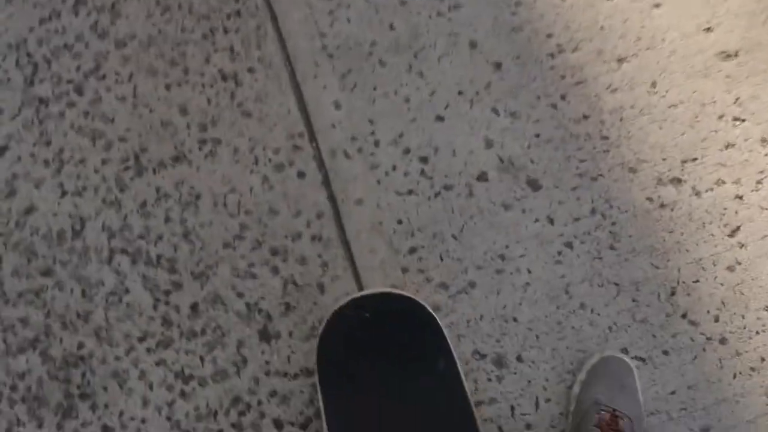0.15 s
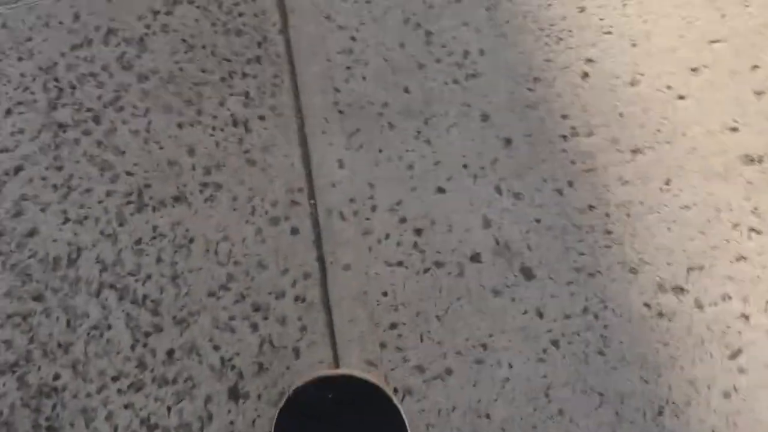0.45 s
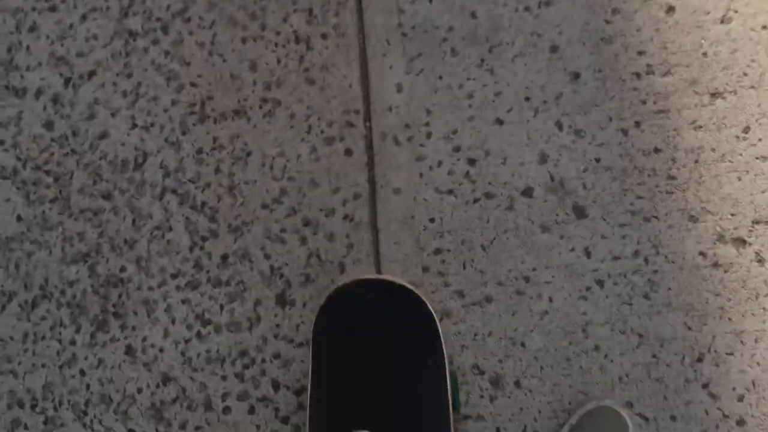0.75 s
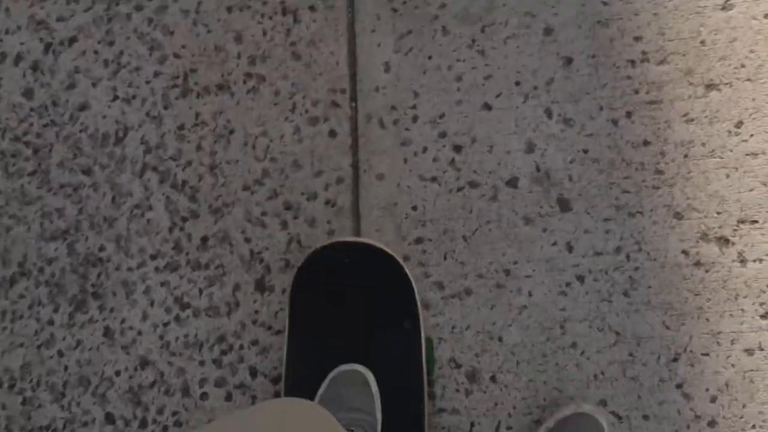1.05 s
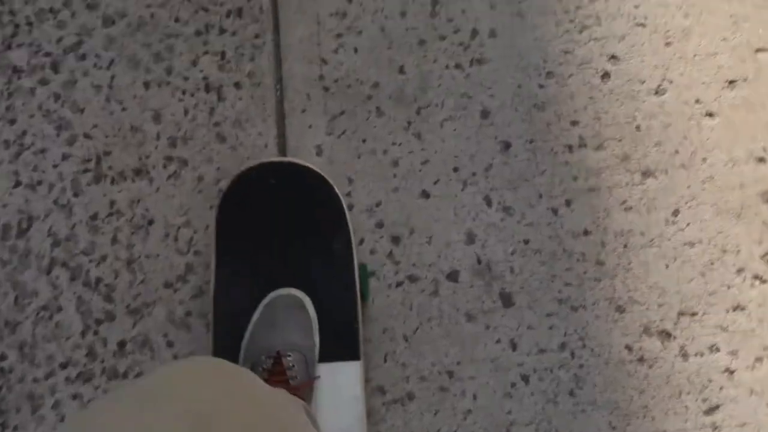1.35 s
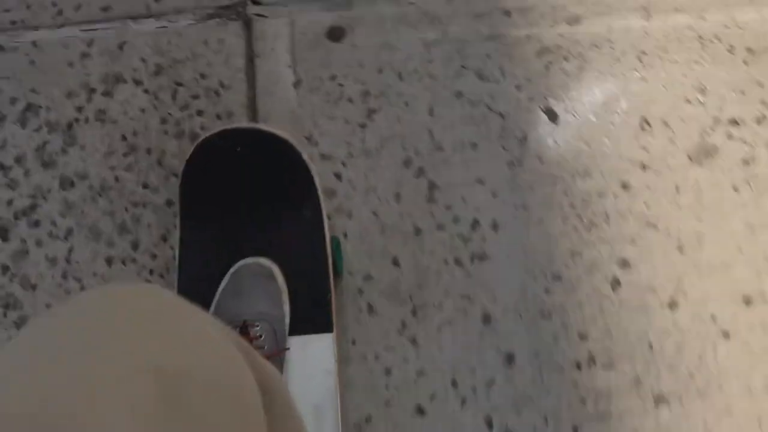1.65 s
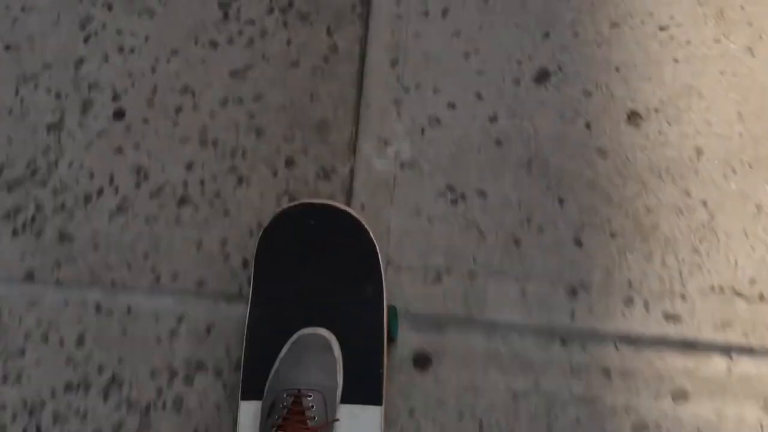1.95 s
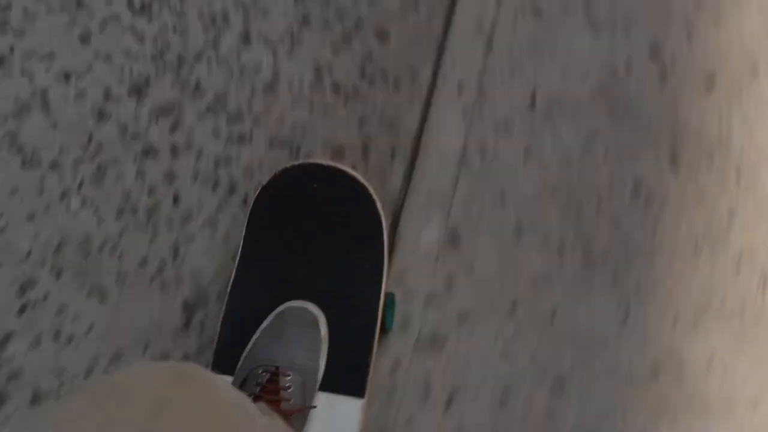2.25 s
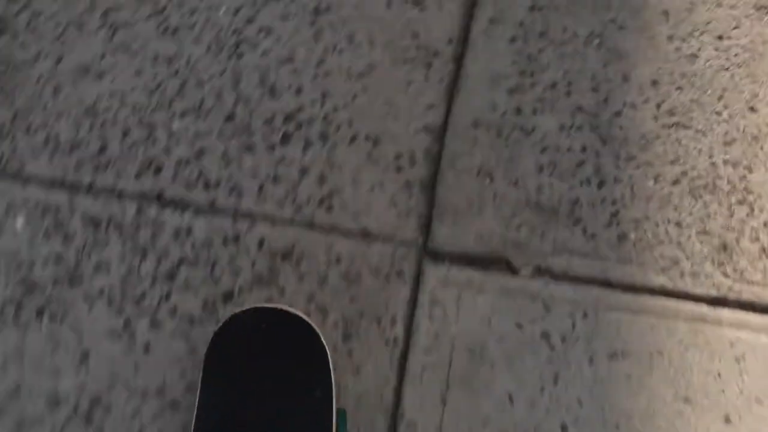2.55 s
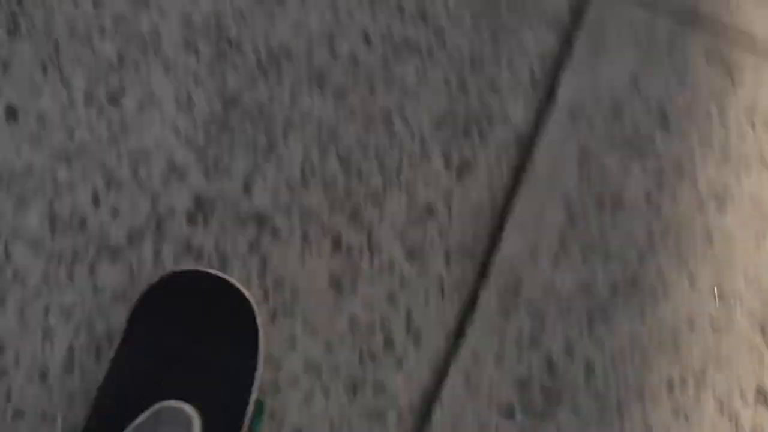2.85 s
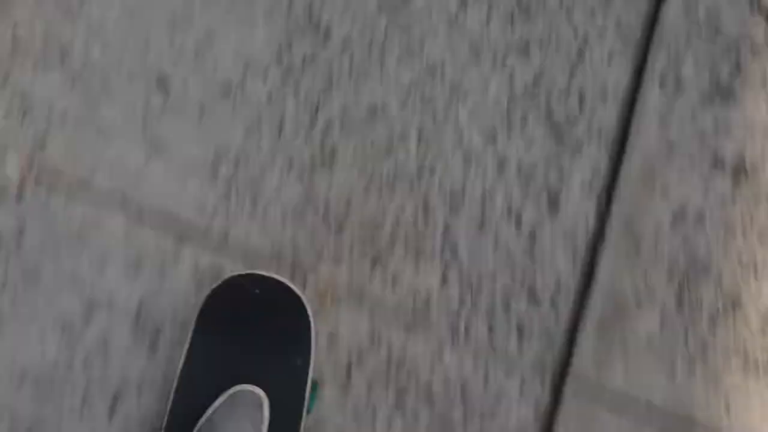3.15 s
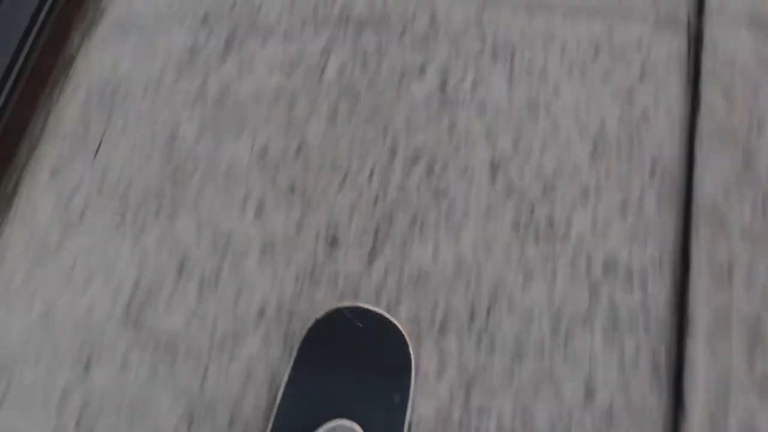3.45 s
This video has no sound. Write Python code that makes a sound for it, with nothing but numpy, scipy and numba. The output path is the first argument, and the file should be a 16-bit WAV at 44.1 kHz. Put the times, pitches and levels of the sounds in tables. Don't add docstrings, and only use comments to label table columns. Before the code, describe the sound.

A skateboard rolls along rough pavement, clattering over stones and slab joints, wind buffeting the microphone

```python
import sys
import numpy as np
from scipy import signal
from scipy.fft import rfft, irfft
from scipy.io import wavfile
from scipy.ndimage import uniform_filter1d, map_coordinates
from numba import njit

SR = 44100
rng = np.random.default_rng(int(sys.argv[2]) if len(sys.argv) > 2 else 0)


def nominal_scale(level):
    x = np.asarray(level, float) / 20
    return 10 ** x


def materialize(psi):
    bounded = np.clip(np.atleast_2d(psi).T, -1, 1)
    quanta = np.round(bounded * 32767).astype(np.int16)
    wavfile.write(sys.argv[1], SR, quanta)


N = 158760

# time in seconds, level in dB.
GUSTS = [(0.0, -30), (0.06, -34.5), (1.38, -42.5), (1.56, -34), (1.92, -42), (1.951, -30.5), (2.45, -62),
         (2.55, -30.5), (2.72, -54), (3.22, -34), (3.33, -51), (3.6, -33)]
# frequency in Hz, level in dB.
WIND_SPECTRUM = [(8.8, -49), (15, -16), (43, -5.5), (100, -2.5), (130, -23.5), (220, -120)]
# start in seconds, end in seconds, level in dB.
HORN_TOOTS = [
    (.004, 0.035, -25),
    (3.571, 3.624, -33.5),
]
# frequency in Hz, level in dB.
HORN_PARTIALS = [(1026, 0), (1238, 0), (1626, -10), (2055, -1), (2557, -10)]
# time in seconds, level in dB, ring in Hz, brightness in dB.
KNOCKS = [(0.1, -4, 1490, -15), (0.202, -19.5, 574, -3.5), (0.246, -8, 1500, -5), (0.491, -35.5, 1620, -14),
          (0.587, -23, 695, -2), (0.641, -6.5, 1270, -11.5), (0.652, -12, 694, 8.5), (0.668, -4, 1180, -10),
          (0.711, 0, 1300, -11), (0.727, -4.5, 1740, -3), (0.805, -8.5, 670, -12), (0.869, -3, 660, -3.5),
          (1.111, -17.5, 630, -11.5), (1.22, -9.5, 1380, -9), (1.263, -0.5, 638, -5.5),
          (1.378, -2.5, 674, -21), (1.434, -1, 690, -9), (1.533, 1.5, 592, -19), (1.575, -13.5, 696, 0.5),
          (1.595, 0.5, 676, -20), (1.67, -4.5, 612, -10), (1.711, -11.5, 600, -2), (1.8, -33, 1040, 19.5),
          (1.876, 1, 1805, -5.5), (1.977, -25, 421, 6)]
# time in seconds, level in dB, ring in Hz, brightness in dB.
LATE_KNOCKS = [(2.046, 3, 608, -10), (2.056, -1.5, 435, -17), (2.133, -8.5, 870, -13),
               (2.179, -11.5, 1340, -14), (2.225, -10, 610, -32), (2.257, 5, 645, -20),
               (2.499, -18.5, 880, -6.5), (2.514, -32.5, 640, 2), (2.581, -24.5, 1800, -11),
               (2.646, -4.5, 650, -19.5), (2.694, -16.5, 470, -5), (2.751, -6, 613, -25),
               (2.774, -4, 470, -24), (2.891, -2.5, 665, -25), (3.007, -19, 529, -36),
               (3.051, -10, 460, -10), (3.106, -9, 760, -21), (3.136, -3, 493, -21.5),
               (3.162, 0.5, 573, -14), (3.214, -0.5, 604, -46), (3.239, 0.5, 784, -24.5),
               (3.269, -1, 530, -24), (3.289, -5, 700, -27), (3.301, 1.5, 427, -17.5),
               (3.354, -39, 529, -32), (3.4, -3.5, 520, -23), (3.452, -2, 674, -43), (3.477, -5, 660, -22)]
# time in seconds, level in dB, ring in Hz, brightness in dB.
THUMPS = [(0.153, -11, 150, -29), (.645, -8, 172.4, -40), (1.201, -9.5, 157, -36), (1.569, -19, 71.6, -47),
          (3.038, -8.5, 109.6, -47), (3.157, -10.5, 98, -43), (2.259, -8, 370, -39),
          (2.429, -31.5, 1710, -5), (0.867, -16.5, 3950, -10), (1.089, -8.5, 510, -26),
          (1.261, -10, 2010, 2.5), (1.432, -19, 3740, -1), (2.048, 0, 293, -36), (2.37, -32, 1590, -20),
          (2.397, -32.5, 1690, -16), (2.453, -31, 1630, -8), (2.537, -16.5, 116, -42),
          (2.572, -25.5, 1800, -11), (2.769, -19.5, 2300, 3), (2.909, -2.5, 480, -17.5),
          (3.165, -16.5, 2230, -8), (3.266, -13.5, 2100, 0.5), (1.876, -23.5, 4260, 9.5)]
# time in seconds, level in dB, ring in Hz.
PEBBLES = [(0.0902, -14.5, 1580), (0.1345, -48, 1430), (0.177, -14.5, 1440), (0.2178, -12.5, 1510),
           (0.261, -25.5, 1480), (0.2855, -17, 1780), (0.2981, -9, 1600), (0.3449, -15.5, 1380),
           (0.3605, -23, 1360), (0.3974, -19, 1780), (0.436, -7.5, 1920), (0.4938, -2.5, 1830),
           (0.5385, -15, 1700), (0.6146, -10, 1284), (0.775, -17, 1220), (0.8202, -16, 1290),
           (0.9455, -21, 1330), (1.004, -25, 1210), (1.062, -19, 1304), (1.1437, -19.5, 1230),
           (1.1785, -22.5, 1570), (1.2011, -38.5, 1220), (1.3436, -30.5, 1410), (1.5777, -16, 1780),
           (1.8874, -43.5, 1750), (1.9547, -15, 1720), (1.9758, -17, 1710), (2.0104, -19.5, 1360),
           (2.0298, -11, 1830), (2.8283, -19, 1220), (2.872, -18, 1270), (3.2088, -15, 1790),
           (3.2903, -17, 1980), (3.3103, -22, 2230)]
# time in seconds, level in dB, ring in Hz.
DECK_BUMPS = [(0.015, -10, 191), (0.138, -24, 620), (0.288, -20, 634), (1.393, -6.5, 233),
              (1.493, -26, 630), (1.544, -5.5, 617), (1.629, -5, 598), (1.644, -10.5, 590),
              (1.69, -7.5, 210), (1.97, -10.5, 229), (2.004, -9.5, 300), (2.78, -16, 275),
              (2.832, -15.5, 290), (2.871, -9, 270), (2.924, -5.5, 705), (3.112, -24, 290),
              (3.177, -3, 639), (3.192, -3, 305), (3.22, -9.5, 624), (3.278, -4.5, 614), (3.313, -16, 550),
              (3.419, -13, 480)]
# time in seconds, deck level in dB, truck level over deck in dB,
# truck ring in Hz, grit level over deck in dB.
ROLL = [(0, -24.5, -4.5, 1440, -22), (.3, -22.5, -5, 1440, -23.5), (.5, -24, -2.5, 1315, -18),
        (.78, -24.5, -3, 1255, -20), (.95, -26.5, -5.5, 1150, -22.5), (1.2, -22.5, -6.5, 1345, -22.5),
        (1.6, -23, -10, 1150, -23.5), (2.022, -22.5, -5, 1144, -23), (2.092, -32, -9, 1190, -20),
        (2.17, -24, -12.5, 1220, -31), (2.3, -30, -10, 1120, -31), (2.48, -36.5, -16, 1050, -27),
        (2.62, -27.5, -16.5, 1050, -28), (2.8, -19, -13, 1055, -34), (3.054, -25, -15.5, 1150, -28),
        (3.2, -14, -16, 1070, -31.5), (3.33, -19, -22, 1020, -30), (3.6, -22, -14.5, 1050, -31)]
# frequency in Hz, width in Hz, level in dB.
DECK_MODES = [(108.5, 50.5, -3), (172, 63, 2.5), (241, 71, 2.5), (326, 95, -0.5), (471.6, 97, -0.5),
              (630, 142, 3.5), (761, 294, -4)]
# time in seconds, level in dB.
DECK_BASS = [(0, -4), (.7, 1.5), (1.3, 1), (1.75, 3.5), (2.1, -.5), (2.45, 1.5), (2.8, -6), (3.1, 1.5),
             (3.3, -4), (3.6, -0.5)]
# frequency in Hz, width in Hz, level in dB.
TRUCK_MODES = [(1150, 450, 7), (1785, 130, 6), (1970, 370, 4), (2650, 300, -54), (3470, 300, -43)]
# frequency in Hz, level in dB.
GRIT_SPECTRUM = [(1200, -14), (2500, -3.5), (4000, -3.5), (6000, -7.5), (8000, -14), (12000, -24.5),
                 (13500, -31), (16000, -56)]
# frequency in Hz, level in dB.
SPREAD_SPECTRUM = [(60, -30.5), (500, -41), (1000, -37), (2000, 11.5), (4000, 11), (7000, 8.5), (13000, 4),
                   (15500, -42)]
# time in seconds, lead of the left port in samples.
LEFT_LEAD = [
    (0, 0.44),
    (1.9, 0.027),
    (2.5, 0.25),
    (3.6, 0.55),
]


def unit(x):
    return x / np.sqrt(np.mean(x ** 2) + 1e-18)


def peak(x):
    return x / np.max(np.abs(x))


def curve(table, column=1):
    p = np.array(table, float)
    return np.interp(np.arange(N) / SR, p[:, 0], p[:, column])


@njit
def svf(x, hz, width_hz):
    y, b, l = np.empty(len(x)), 0., 0.
    for i in range(len(x)):
        g, k = np.tan(np.pi * hz[i] / SR), width_hz / hz[i]
        v = (b + g * (x[i] + 1e-18 - l)) / (1 + g * (g + k))
        b, l, y[i] = 2 * v - b, l + 2 * g * v, k * v
    return y


def body(x, modes):
    out = np.zeros(len(x))
    for k, (hz, width_hz, db) in enumerate(modes):
        mode = svf(x, np.full(len(x), 1. * hz), 1. * width_hz)
        out += (-1) ** k * nominal_scale(db) * mode / np.sqrt(width_hz)
    return out


def colour(x, spectrum):
    hz = np.maximum(np.arange(N // 2 + 1) * SR / N, 1)
    p = np.array(spectrum, float)
    gain_db = np.interp(np.log(hz), np.log(p[:, 0]), p[:, 1])
    return irfft(rfft(x) * nominal_scale(gain_db), N)


def walk(rate_hz):
    k = int(SR / rate_hz)
    held = np.repeat(rng.standard_normal(N // k + 1), k)
    return unit(uniform_filter1d(uniform_filter1d(held, k), k)[:N])


def soft(x):
    wheel_hz = 2740
    return signal.sosfilt(signal.butter(2, wheel_hz, fs=SR, output="sos"), x)


def wind():
    level_db = -1 + curve(GUSTS) + 1.4 * walk(4.0)
    return nominal_scale(level_db) * unit(colour(rng.standard_normal(N), WIND_SPECTRUM))


def horn():
    t = np.arange(N) / SR
    attack_s, release_s = 0.008, 0.019
    gate, tone = np.zeros(N), np.zeros(N)
    for start, end, db in HORN_TOOTS:
        rise = np.clip((t - start) / attack_s, 0, 1)
        gate += nominal_scale(db) * rise * np.clip((end - t) / release_s, 0, 1)
    for hz, db in HORN_PARTIALS:
        tone += nominal_scale(db) * nominal_scale(2 * walk(90)) * np.sin(2 * np.pi * hz * t)
    return gate * tone


def knock_list():
    push_s = .002
    events = list(KNOCKS) + list(LATE_KNOCKS) + list(THUMPS)
    events += [(s - push_s, db + 1.5, hz, -7.5) for s, db, hz in PEBBLES]
    events += [(s - push_s, db + 0.5, hz, -40) for s, db, hz in DECK_BUMPS]
    return events


def knock_force(scrape):
    push_s, bounce_s, bounce_drop_db, scrape_share = .002, .007, 9, 0.073
    u = rng.random((2, 3))
    force = scrape_share * scrape
    force[int(push_s * SR)] = 1
    bounce_at = ((push_s + np.cumsum(.5 + u[0]) * bounce_s) * SR).astype(int)
    force[bounce_at] -= nominal_scale(-bounce_drop_db * (0.5 + np.arange(3) / 2 + u[1]))
    return soft(force)


def knock_ring(force, hz, bright_db):
    contact_cycles, ring_q, widest_hz, swell_share, deck_db = 0.53, 3.88, 340., .6, -5.5
    count = len(force)
    push = np.convolve(force, np.hanning(3 + int(contact_cycles * SR / hz)))[:count]
    centre_hz = np.full(count, 1. * hz)
    ring = svf(push, centre_hz, min(hz / ring_q, widest_hz))
    ring = svf(ring, centre_hz, min(hz * swell_share, 2 * widest_hz))
    deck_share = nominal_scale(deck_db) * (200 < hz < 1300) * min(hz / 900, 1)
    wood = peak(peak(ring) + deck_share * peak(body(push, DECK_MODES[2:])))
    return wood + nominal_scale(bright_db + 3.5) * peak(body(force, TRUCK_MODES))


def knocks():
    scrape_s, scrape_rise_s, count = .009, .005, 4096
    tick_db, spread_db = -17, -29
    t = np.arange(count) / SR
    rise = np.sin(np.pi / 2 * np.minimum(t / scrape_rise_s, 1)) ** 2
    mid, tick = np.zeros(N), np.zeros(N)
    for s, db, hz, bright_db in knock_list():
        scrape = rng.standard_normal(count) * np.exp(-t / scrape_s) * rise
        hit = knock_ring(knock_force(scrape), hz, bright_db)
        i = int(s * SR)
        n = min(count, N - i)
        mid[i:i + n] += nominal_scale(db - 6.0) * hit[:n]
        tick[i:i + n] += nominal_scale(db + 0.91 * bright_db) * scrape[:n]
    hiss = np.sqrt(np.mean(tick ** 2))
    mid += nominal_scale(tick_db) * hiss * unit(colour(soft(tick) + 0.44 * tick, GRIT_SPECTRUM))
    side = nominal_scale(spread_db) * hiss * unit(colour(tick * np.sign(walk(5000)), SPREAD_SPECTRUM))
    return mid, side


def stones():
    stones_per_s, scatter_db, top_db, texture_share = 400, 7.5, 8, 0.86
    patch_db, patches_per_s, even_s = 2.8, 55, .07
    u = rng.random((3, N))
    size = nominal_scale(np.minimum(-scatter_db * np.log(1 - u[2]), top_db))
    ticks = (u[0] < stones_per_s / SR) * np.sign(u[1] - .5) * size
    force = unit(ticks) + texture_share * rng.standard_normal(N)
    force *= nominal_scale(patch_db * walk(patches_per_s))
    span = int(even_s * SR)
    power = uniform_filter1d(uniform_filter1d(force ** 2, span), span)
    return force / np.sqrt(power)


def deck_ring(front, rear):
    low = nominal_scale(curve(DECK_BASS)) * body(soft(0.57 * front + rear), DECK_MODES[:4])
    return unit(low + body(soft(front + 0.71 * rear), DECK_MODES[4:]))


def truck_ring(front, rear):
    width_hz, level_db = 138., 4
    moving = svf(0.82 * front + 0.87 * rear, curve(ROLL, 3), width_hz) / np.sqrt(width_hz)
    return unit(soft(body(front, TRUCK_MODES) + nominal_scale(level_db) * moving))


def rolling():
    flicker_db, flickers_per_s = 2.3, 25
    front, rear = stones(), stones()
    deck, trucks = deck_ring(front, rear), truck_ring(front, rear)
    flicker = nominal_scale(flicker_db * walk(flickers_per_s))
    hiss = 0.28 * unit(front) + flicker * rng.standard_normal(N)
    grit = unit(colour(hiss, GRIT_SPECTRUM))
    load, grit_db = nominal_scale(curve(ROLL, 1)), curve(ROLL, 4)
    mid = load * (deck + nominal_scale(curve(ROLL, 2)) * trucks + nominal_scale(grit_db) * grit)
    spread = unit(colour(flicker * rng.standard_normal(N), SPREAD_SPECTRUM))
    side = load * nominal_scale(-30.5 + .3 * (grit_db + 34.0)) * spread
    return mid, side


def scene():
    left_db = .7
    roll, roll_side = rolling()
    knock, knock_side = knocks()
    mid = wind() + horn() + knock + roll
    lean = (nominal_scale(left_db / 2) - 1) * svf(mid, np.full(N, 3000.), 4500.)
    side = roll_side + knock_side + lean
    at, half_lead = np.arange(N), curve(LEFT_LEAD) / 2
    left = map_coordinates(mid, [at + half_lead], mode="mirror") + side
    right = map_coordinates(mid, [at - half_lead], mode="mirror") - side
    return np.array([left, right])


def band_limit(x):
    return signal.sosfilt(signal.butter(12, 15600, fs=SR, output="sos"), x)


def record(dry):
    knee = .7
    size = np.abs(dry)
    over = np.maximum(size - knee, 0)
    held = np.minimum(size, knee) + (1 - knee) * np.tanh(over / (1 - knee))
    return band_limit(np.sign(dry) * held)


dry = scene()
out = record(dry)
materialize(out)
```